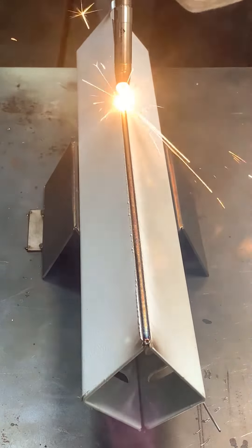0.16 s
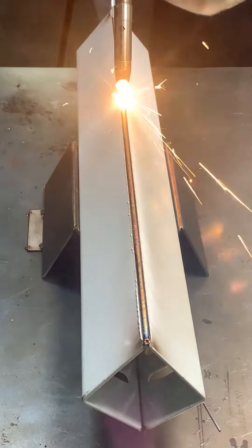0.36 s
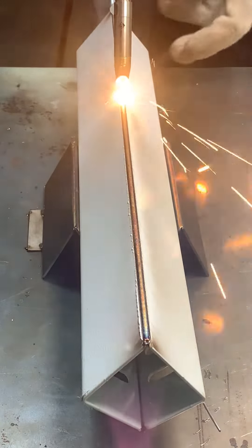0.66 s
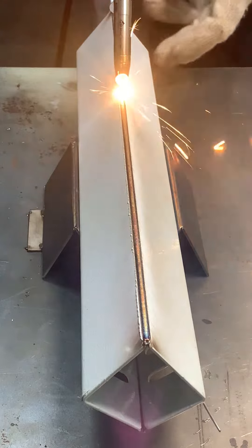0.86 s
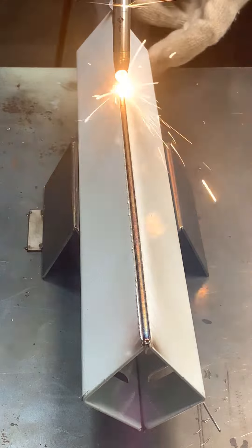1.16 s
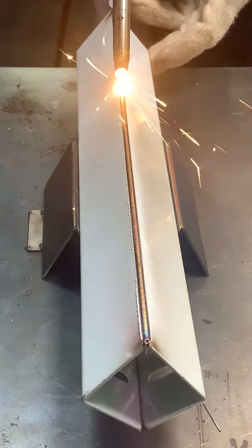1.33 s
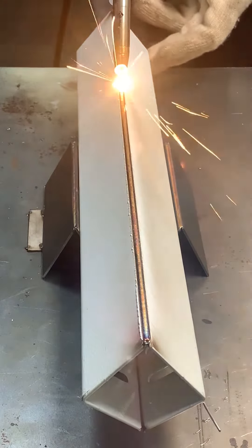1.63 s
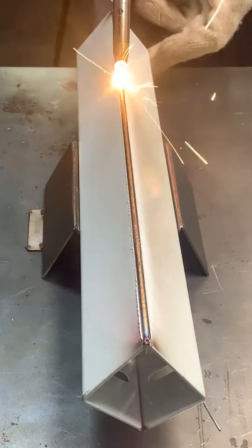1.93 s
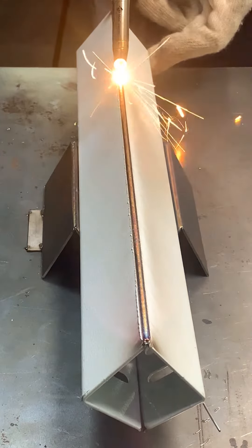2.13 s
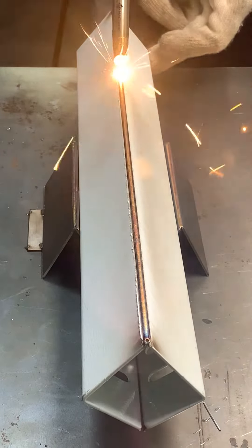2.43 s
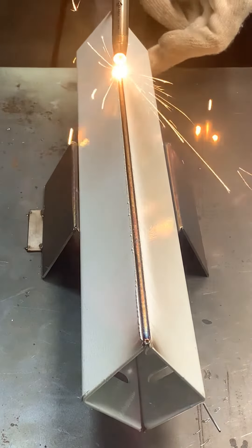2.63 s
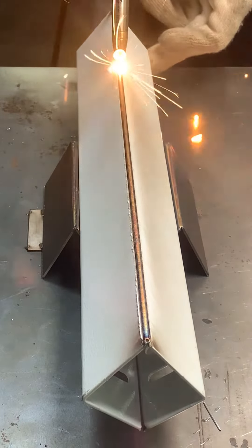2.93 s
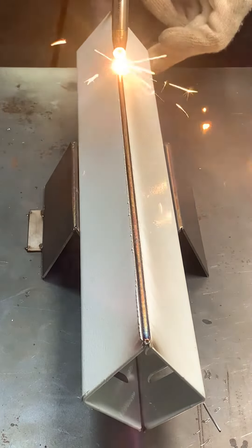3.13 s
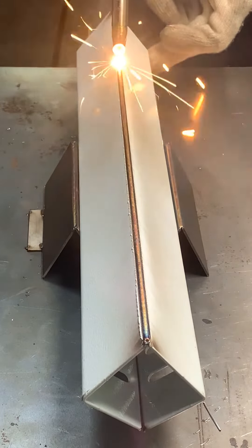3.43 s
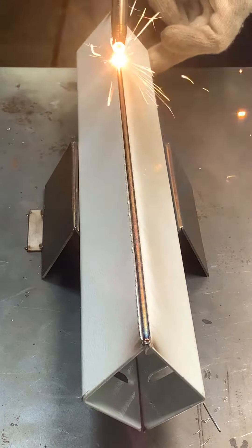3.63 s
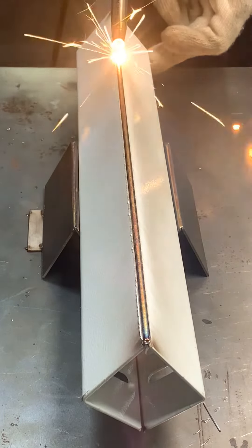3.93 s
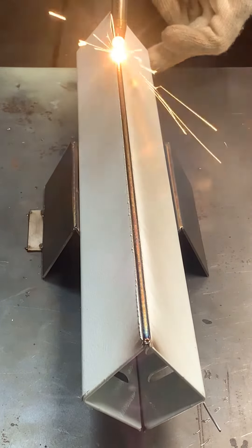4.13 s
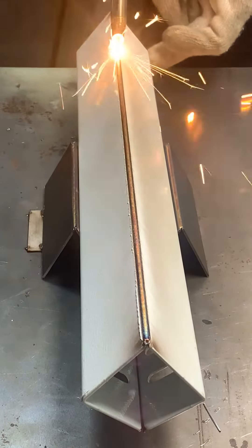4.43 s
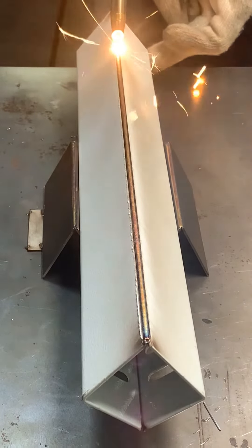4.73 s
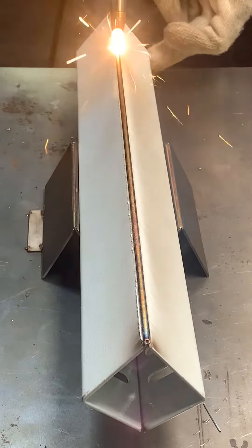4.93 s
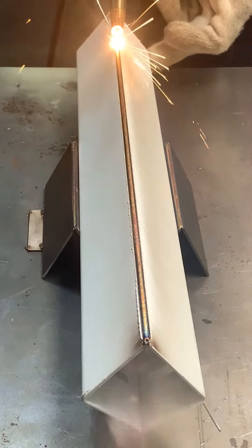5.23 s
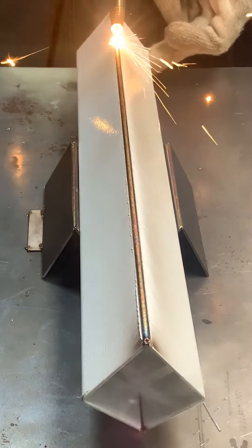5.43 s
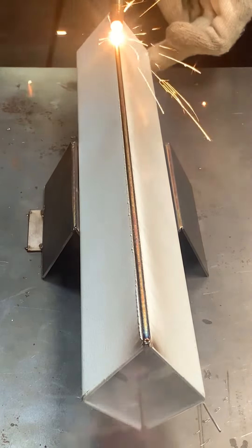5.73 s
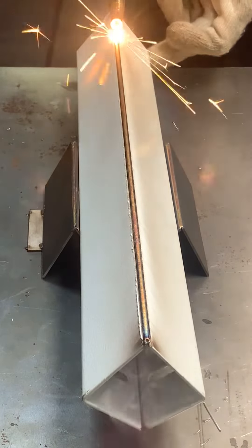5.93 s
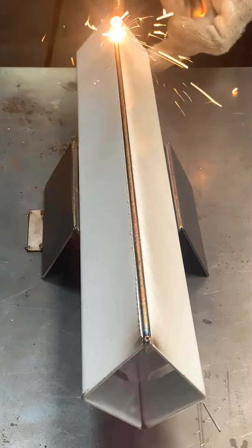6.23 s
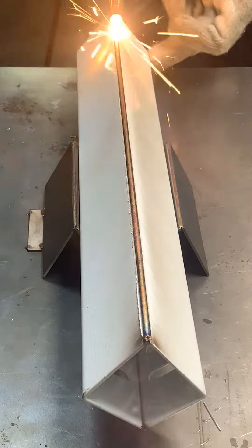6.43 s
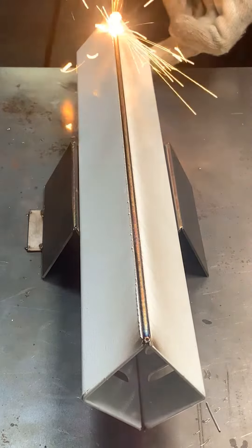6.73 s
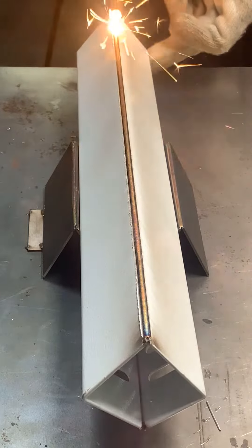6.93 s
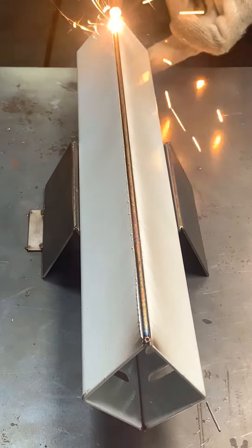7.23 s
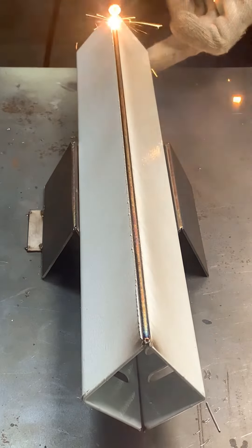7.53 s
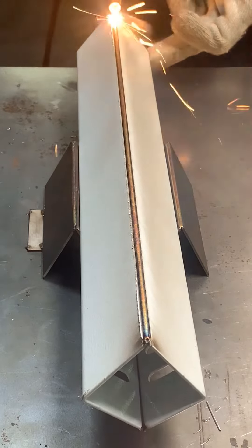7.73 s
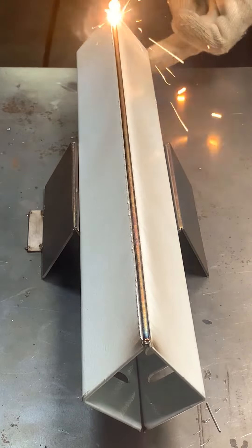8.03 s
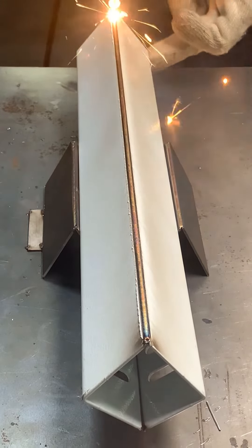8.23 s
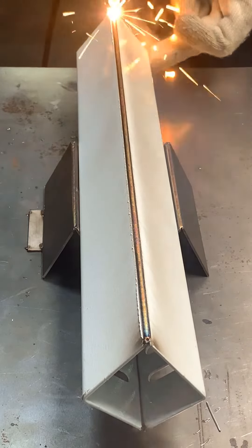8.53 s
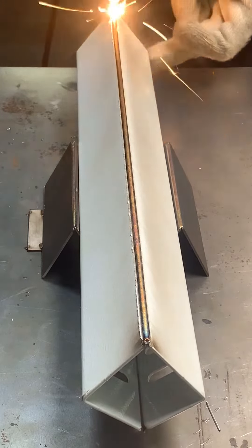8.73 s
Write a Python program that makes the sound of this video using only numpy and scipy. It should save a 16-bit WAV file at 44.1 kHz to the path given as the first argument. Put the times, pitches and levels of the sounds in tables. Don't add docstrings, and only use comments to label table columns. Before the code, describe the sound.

A laser weld is already running along a steel tube on a workshop bench, heard closely in wide stereo. Its bright, gritty hiss throbs nearly fifty times a second, making a coarse electric-like buzz with fine crackling and soft, low mechanical knocks from the torch. Cooling fans hum and rumble quietly underneath. A sharp droplet crack comes at 0.1 seconds, with softer ones at 0.9 and 1.3. Around 1.7 to 1.8 a cluster of air puffs thuds and rustles on the microphone; from about 1.9 to 2.5 the hiss ducks, then returns. Small cracks follow at 2.8 and 3.0. The hiss continues steadily, its lower part thinning and its tone shifting through short metallic echoes as the torch recedes. Another crack lands at 6.4 with faint puffs at 6.5. It strengthens after 7, then collapses abruptly at 8.8 to a trace of gas and fan hum.

```python
import sys
import numpy as np
from scipy import signal
from scipy.fft import rfft, irfft, next_fast_len
from scipy.io import wavfile

SR = 44100
rng = np.random.default_rng(int(sys.argv[2]) if len(sys.argv) > 2 else 0)


def invert_db(level):
    return 10 ** (np.asarray(level, dtype=float) / 20)


def output_pcm(signal):
    pcm = np.clip(np.atleast_2d(signal).T, -1, 1) * 32767
    wavfile.write(sys.argv[1], SR, np.round(pcm).astype(np.int16))


N = 391158
T = np.arange(N) / SR
TRAVEL = T / T[-1]
PAD = next_fast_len(N + 4096)
HZ = np.arange(PAD // 2 + 1) * SR / PAD
SWEEP_HZ, SWEEP_START = 48.764, -.02


def rms_one(x):
    return x / np.sqrt(np.mean(x ** 2) + 1e-20)


def near_to_far(near, far):
    return near + (far - near) * TRAVEL


def column(rows, at, index=1):
    rows = np.array(rows)
    return np.interp(at, rows[:, 0], rows[:, index])


def shape(x, response):
    return irfft(rfft(x, PAD) * response, PAD)[..., :N]


def colour(points):
    hz, db = np.transpose(points)
    return invert_db(np.interp(np.log(HZ + 1), np.log(hz), db, left=-70))


def drift(rate_hz):
    r = np.exp(-32 * np.pi * rate_hz / SR)
    noise = rng.standard_normal(N // 16 + 4002)
    slow = signal.lfilter([1], [1, -2 * r, r * r], noise)[4000:]
    return np.interp(np.arange(N) / 16, np.arange(len(slow)), rms_one(slow))


# pitch_hz, level_db (rms)
HUM = [(97.5, -59), (599.5, -62.5), (1999.5, -67)]
# pitch_hz, level_db (per Hz)
SHOP = [(21, -37), (35, -1), (75, 0), (108, 0.5), (188, -4), (311, -5), (403, -10.5), (496, -6),
        (1040, -13.5), (1160, -11.5), (1480, -14.5), (2200, -17), (2860, -6.5), (4840, -120)]
# pitch_hz, likeness (0 to 1)
LIKENESS = [(40, 1), (250, 0.83), (800, 0.57), (2500, 0.85)]


def shop():
    hz, likeness = np.transpose(LIKENESS)
    alike = np.clip(np.interp(np.log(HZ + 1), np.log(hz), likeness), 0, 1)
    flutter = invert_db(1.04 * drift(13.0))
    mid = shape(rng.standard_normal(N) * flutter, colour(SHOP) * np.sqrt(1 + alike))
    side = shape(rng.standard_normal(N), colour(SHOP) * np.sqrt(1 - alike))
    level_db = near_to_far(-49.5, -46.5) + 1.5
    air = rms_one(np.array([mid + side, mid - side])) * invert_db(level_db)
    tones = np.zeros(N)
    for hz, db in HUM:
        tones += np.sqrt(2) * invert_db(db + 2.0 * drift(4.0)) * np.sin(2 * np.pi * hz * T)
    return air + tones


# peak_s, peak_db, rustle_db (against the peak)
PUFFS = [
    (1.694, -32, -27),
    (1.735, -35, -7),
    (1.778, -27, -10.5),
    (6.46, -38, -16),
    (6.496, -39, -17),
]
# pitch_hz, level_db (per Hz)
PUFF = [(12, -43), (20, -12), (86, -0.5), (265, -12), (341, -17), (394, -20.5), (677, -39), (1500, -56),
        (1950, -69), (3300, -120)]


def puffs():
    rise_s, fall_s = 0.021, 0.015
    air = rng.standard_normal(N) + 0.32 * rng.standard_normal((2, N))
    air = air * invert_db(2.5 * drift(36))
    thud = rms_one(shape(air, colour(PUFF) * (HZ < 300)))
    rustle = rms_one(shape(air, colour(PUFF) * (HZ >= 300) * (HZ / 300) ** 0.97))
    out = np.zeros((2, N))
    for peak_s, db, rustle_db in PUFFS:
        swell = np.exp(-np.abs(T - peak_s) / np.where(T < peak_s, rise_s, fall_s))
        out += invert_db(db) * swell * (thud + invert_db(rustle_db) * rustle)
    return out


# pitch_hz, level_db, fade_s (time to fall 60 dB)
MIRROR = [(185.6, -47.5, 0.035), (510.6, -46, 0.027), (690, -47.5, 0.013), (831, -53, 0.009),
          (975, -58.5, 0.028), (1310, -71, 0.032)]


def mirror(turn):
    knock_at, echo_ms = .79, 5.924
    clicks = np.diff(np.floor(turn - knock_at), prepend=0) > 0
    clicks = clicks * invert_db(2.33 * drift(4.4) + 2.0 * drift(0.13))
    clicks = clicks + 0.67 * np.roll(clicks, round(echo_ms * SR / 1000))
    out = np.zeros(N)
    for hz, db, fade_s in MIRROR:
        r, w = invert_db(-60 / (fade_s * SR)), 2 * np.pi * hz / SR
        ring = signal.lfilter([0, np.sin(w)], [1, -2 * r * np.cos(w), r * r], clicks + 1e-18)
        out += invert_db(db) * ring
    return out


# start_s, peak_db
SPATTER = [
    (0.1082, -13),
    (0.919, -17),
    (1.274, -15),
    (2.8214, -17),
    (3.028, -16.5),
    (6.4048, -14),
]


def spatter():
    length = 1300
    out, age = np.zeros((2, N)), np.arange(length) / SR
    cracks = rng.standard_normal((len(SPATTER), 2, length))
    for (start_s, db), crack in zip(SPATTER, cracks):
        at = round(start_s * SR)
        snap = invert_db(db - 14.0 - 60 * age / 0.0092)
        sizzle = invert_db(db - 19 - 60 * age / .12)
        out[:, at:at + length] += (snap + sizzle) * crack
    return signal.sosfilt(signal.butter(2, 2500, "high", fs=SR, output="sos"), out)


# time_s, plume_db
WELD = [
    (0.0, -32),
    (1.2, -32),
    (3.2, -31.5),
    (5.5, -31.5),
    (7.4, -30.5),
    (8.87, -30),
]
# pitch_hz, near_db, far_db
PLUME = [(1554, -22, -46), (2540, -10, -19), (3400, -6, -6), (4200, -8.5, -8), (5000, -12, -11),
         (6000, -8, -6.5), (6780, -8.5, -8), (8090, -5.5, -6), (8200, -5, .5), (8800, -6, -5.5),
         (9600, -1, -4), (11850, -6.5, -5.5), (13100, -2, -8.5), (15300, -4, -2)]


def plume(turn):
    flare_at, flare_rise, sag_at = .075, .045, .44
    flare_db, grow_db, sag_db = 1.75, 2.5, -7.5
    sweep_db = np.interp((turn - flare_at) % 1, [0, flare_rise, sag_at - flare_at, 1],
                         [sag_db, flare_db, flare_db + grow_db, sag_db])
    throb = invert_db(sweep_db + 0.36 * drift(5.3) + 0.94 * drift(98) + 1.05 * drift(330))

    happens = rng.random(N) < 2500 / SR
    pop_size = invert_db(5.6 * np.minimum(rng.exponential(1, N), 3.5))
    pops = happens * pop_size * rng.choice([-1, 1], N)
    boil = rng.standard_normal(N) + 0.27 * rms_one(pops)
    steady_gas = 0.22 * rng.standard_normal(N)

    hz, near_db, far_db = np.transpose(PLUME)
    colours = np.array([colour(np.c_[hz, db]) for db in (near_db, far_db)])
    near, far = shape(rms_one(boil * throb) + steady_gas, colours)
    hiss = rms_one(near_to_far(near, far))
    low = signal.sosfilt(signal.butter(4, 8500, fs=SR, output="sos"), hiss)
    hiss = hiss + (invert_db(near_to_far(-4.5, -1)) - 1) * low

    beam_off_s, gas_left_db = 8.822, -16
    collapse_db = np.clip(900 * (beam_off_s - T), gas_left_db, 0)
    return hiss * invert_db(column(WELD, T) + collapse_db + 6.5)


# near_ms, far_ms, near_gain, far_gain
ECHOES = [(2.215, 1.99, -.15, -.27), (.385, .3, -.15, -.12), (.81, .79, -.13, -.1), (.62, .54, .01, -.15),
          (1.3, 1.1, .03, .12), (3.88, 3.64, -.03, -.1), (1.86, 1.64, .08, .08)]


def bench(x):
    clutter_gain, shrink = .12, .1
    fine = signal.resample_poly(x, 4, 1)
    out = x.copy()
    delays_ms = rng.uniform(2.5, 9.0, size=8)
    gains = clutter_gain * rng.standard_normal(size=(8, 2))
    clutter = [(ms, ms * (1 - shrink), a, b) for ms, (a, b) in zip(delays_ms, gains)]
    for near_ms, far_ms, near_gain, far_gain in ECHOES + clutter:
        lag_s = near_to_far(near_ms, far_ms) * 1e-3
        late = np.interp((T - lag_s) * 4 * SR, np.arange(len(fine)), fine)
        out += near_to_far(near_gain, far_gain) * late
    return rms_one(out) * np.std(x)


# pitch_hz, lead_half_turns
PORT_BASS = [(0, 0), (2100, 0.3), (3600, 0.4)]
# lead_half_turns, near_from_hz, near_to_hz, far_from_hz, far_to_hz
PORTS = [(1, 4600, 4950, 4300, 5050), (2, 6500, 7050, 6600, 7300), (3, 8450, 9000, 8600, 9450),
         (4, 10900, 11650, 11000, 11600), (5, 12750, 13600, 12750, 13650), (6, 14800, 22050, 14900, 22050)]


def ports(x):
    views = []
    for index in (1, 3):
        steps = []
        for row in PORTS:
            steps.append((row[index], row[0] - .08))
            steps.append((row[index + 1], row[0] + .08))
        lead = np.pi / 2 * column(PORT_BASS + steps, HZ)
        views.append(shape(x, np.exp(1j * np.array([lead, -lead]))))
    near, far = views
    return near + (far - near) * (TRAVEL + 0.088 * drift(4.4))


def hall(x):
    fade_s, length = .2, 12000
    tail = rng.standard_normal((2, length)) * invert_db(-60 * np.arange(length) / SR / fade_s)
    walls = invert_db(-5.0) / np.sqrt(1 + (HZ / 3000) ** 2.26)
    return shape(x, walls * rfft(tail / np.linalg.norm(tail[0]), PAD))


def scene():
    turn = SWEEP_HZ * T + SWEEP_START
    lean_db = 1.47 * np.clip(np.log2((HZ + 1) / 60) / 2, 0, 1) / (1 + (HZ / 900) ** 4)
    lean = invert_db(lean_db)
    low = shape(mirror(turn) + shop(), np.array([1 / lean, lean]))
    hiss = bench(plume(turn))
    bass_cut = signal.butter(3, 38, "high", fs=SR, output="sos")
    return ports(hiss) + hall(hiss) + spatter() + signal.sosfilt(bass_cut, low + puffs())


def low_pass(x):
    return signal.sosfilt(signal.butter(12, 16860, fs=SR, output="sos"), x)


def record(dry):
    start_s, hold_s, ramp_s = 1.87, 0.558, 0.037
    mid_db, bass_db = -7.5, -1.5
    below = 1 / (1 + (HZ / 2270) ** 8)
    bass = shape(dry, below)
    band = shape(dry, (1 - below) / (1 + (HZ / 8050) ** 40))
    guard = np.clip(np.minimum(T - start_s, start_s + hold_s + ramp_s - T) / ramp_s, 0, 1)
    guarded = dry + (invert_db(mid_db * guard) - 1) * band + (invert_db(bass_db * guard) - 1) * bass
    top_cut = signal.ellip(14, .3, 90, 15480, fs=SR, output="sos")
    return low_pass(signal.sosfilt(top_cut, guarded))


dry = scene()
out = record(dry)
output_pcm(out)
```